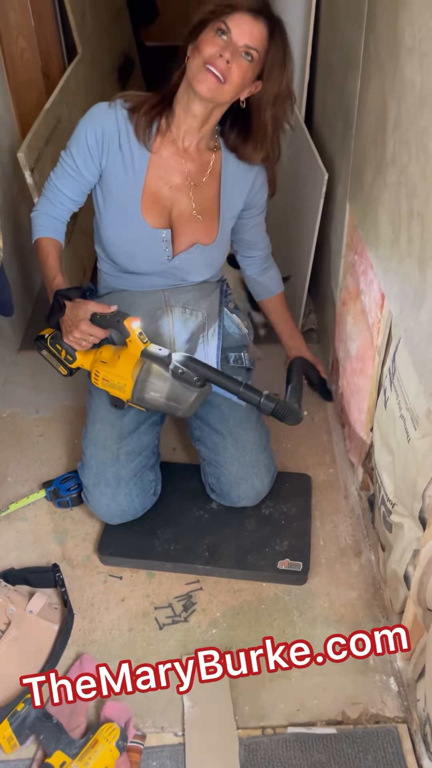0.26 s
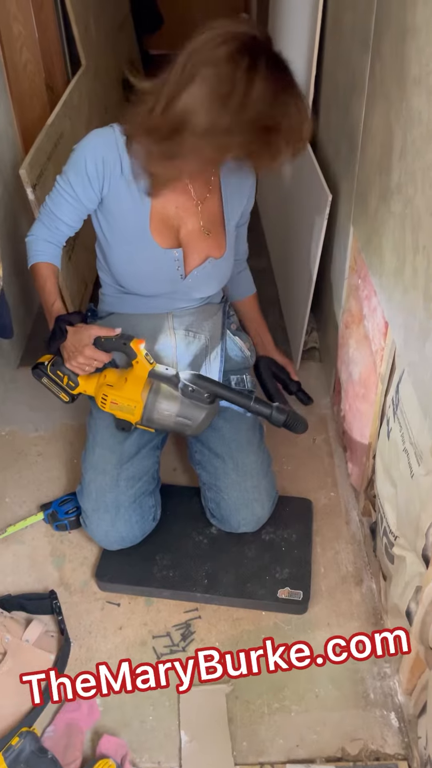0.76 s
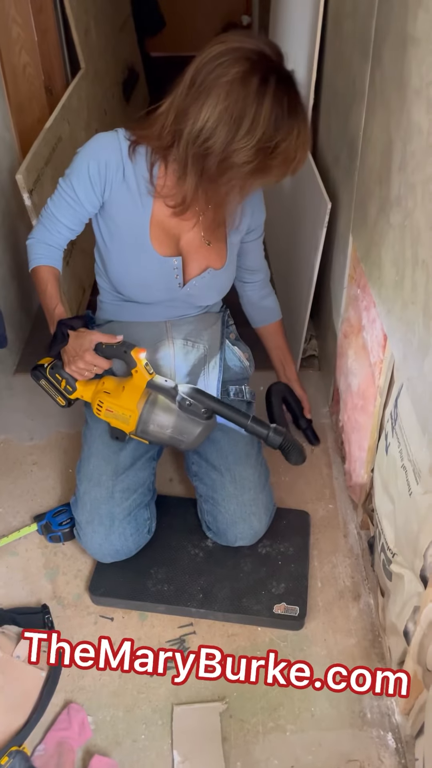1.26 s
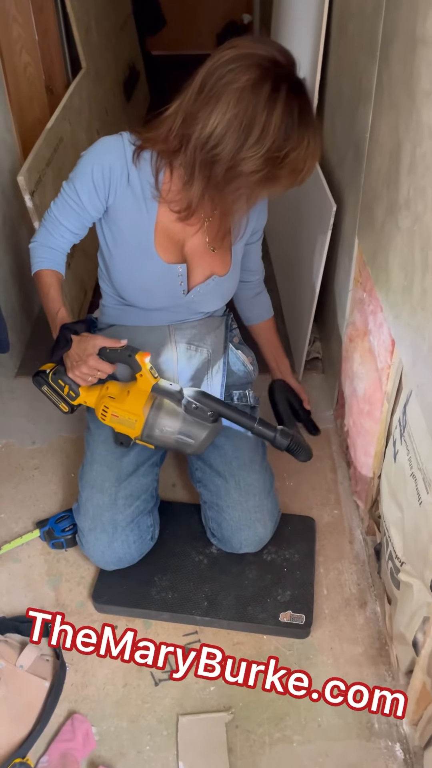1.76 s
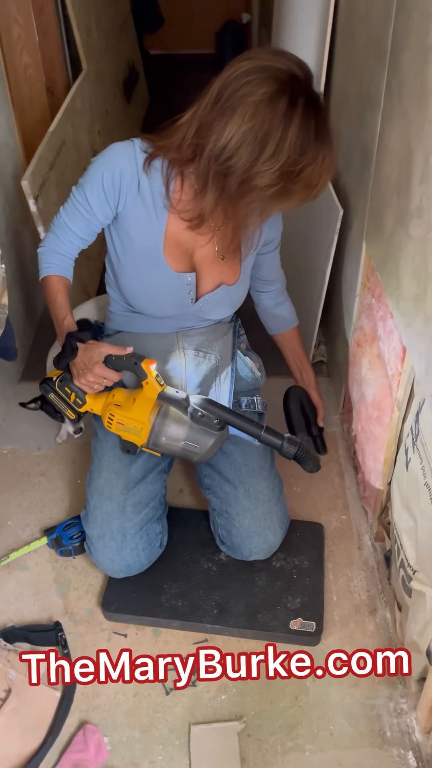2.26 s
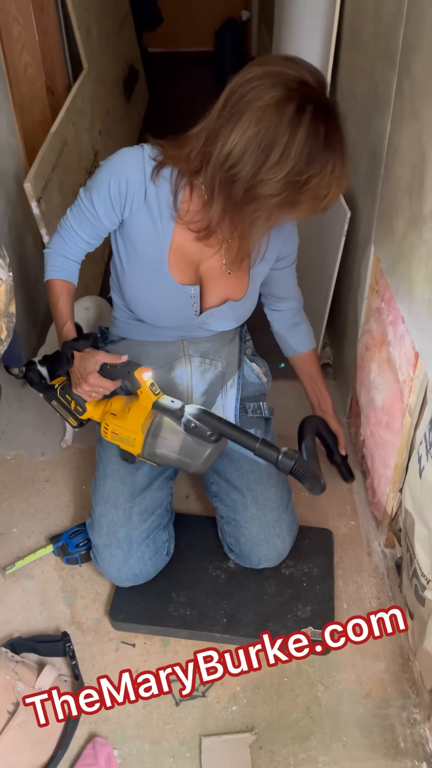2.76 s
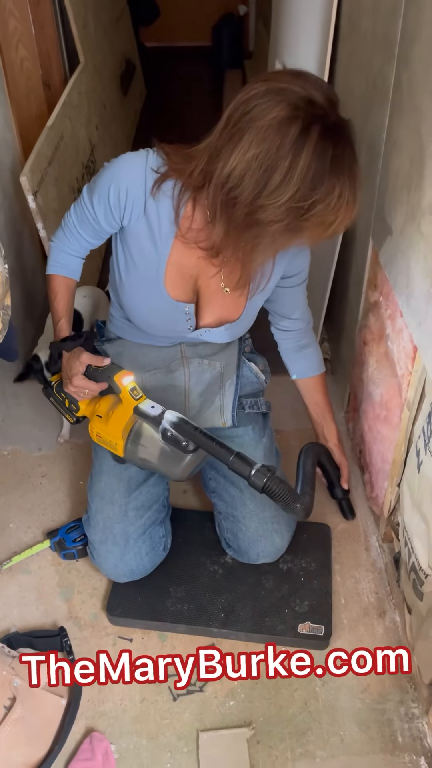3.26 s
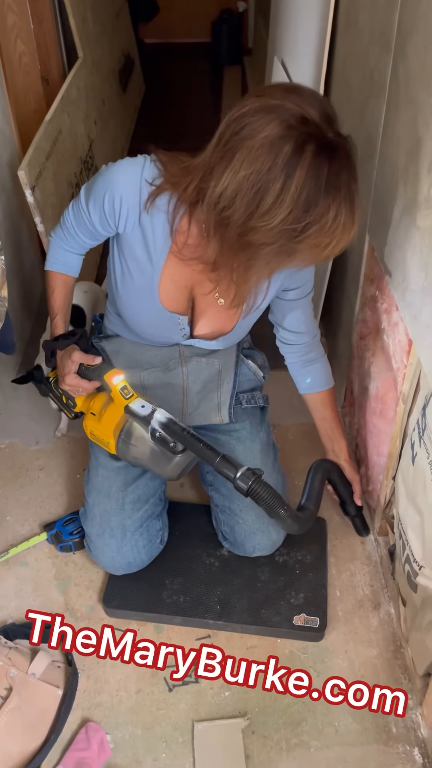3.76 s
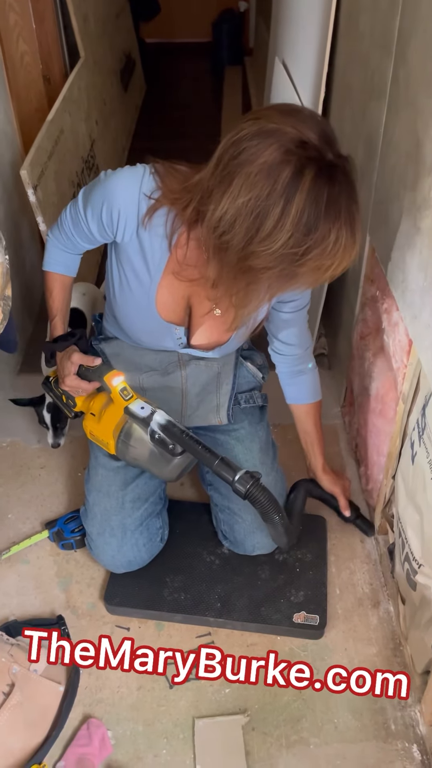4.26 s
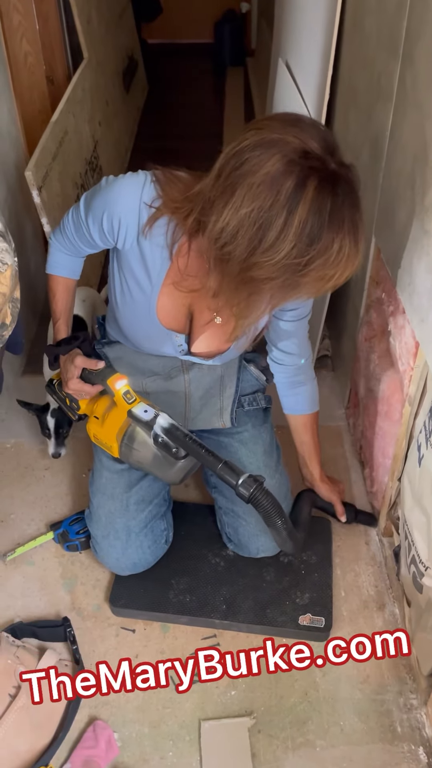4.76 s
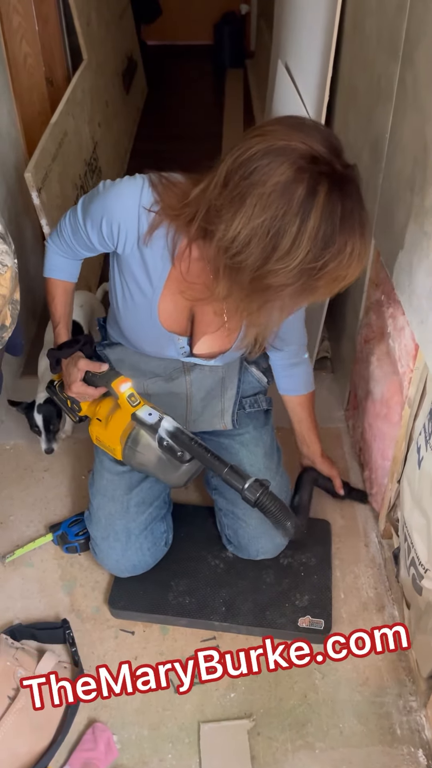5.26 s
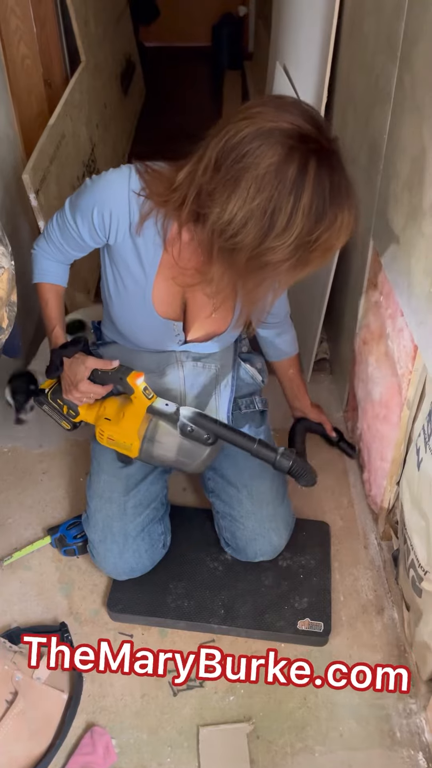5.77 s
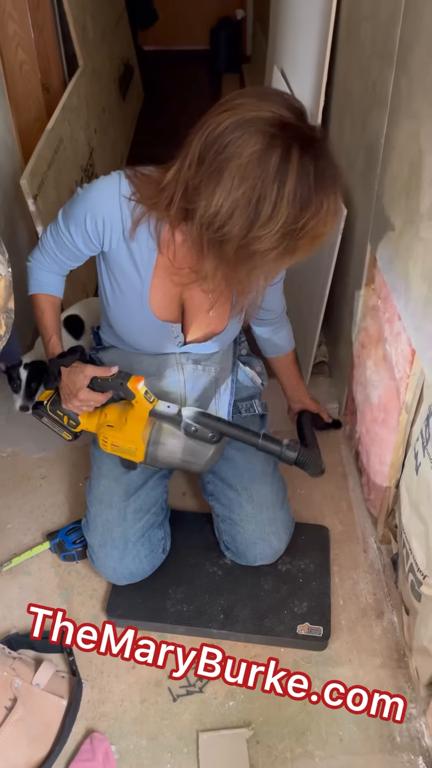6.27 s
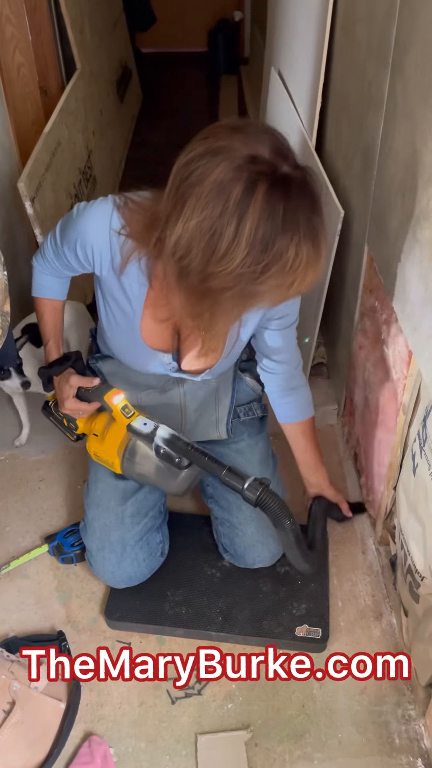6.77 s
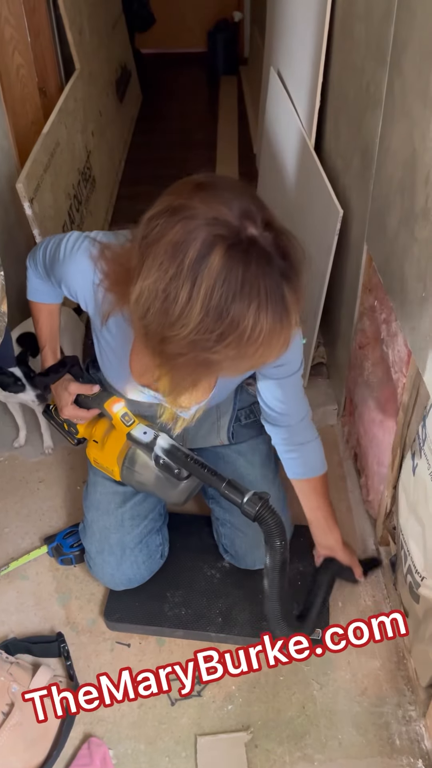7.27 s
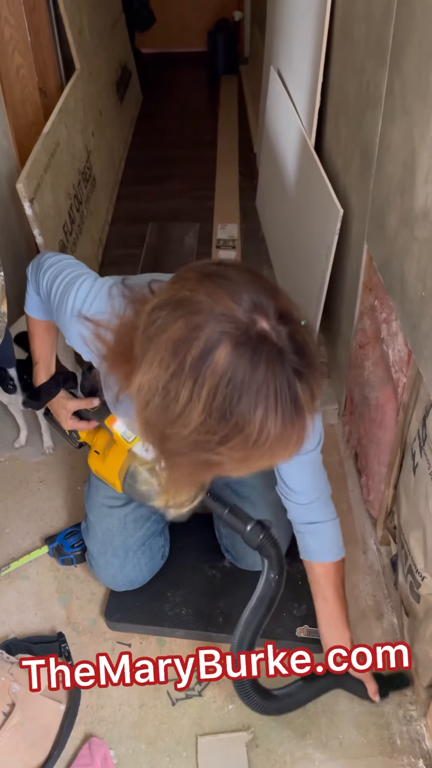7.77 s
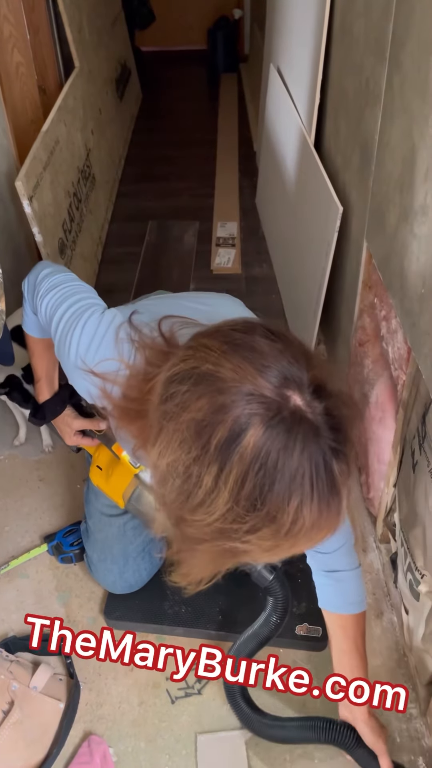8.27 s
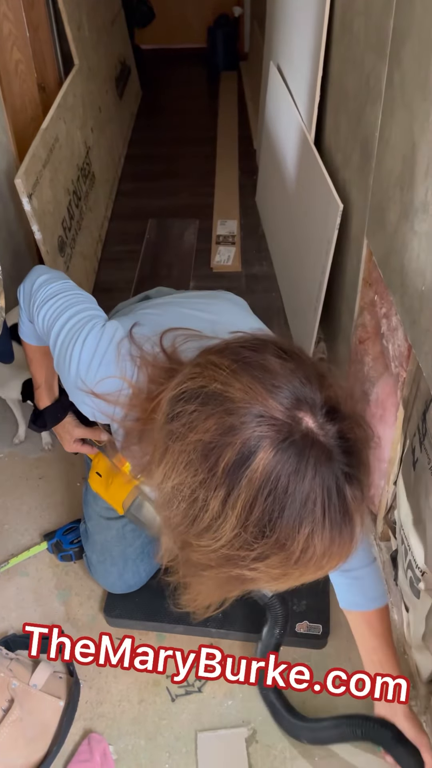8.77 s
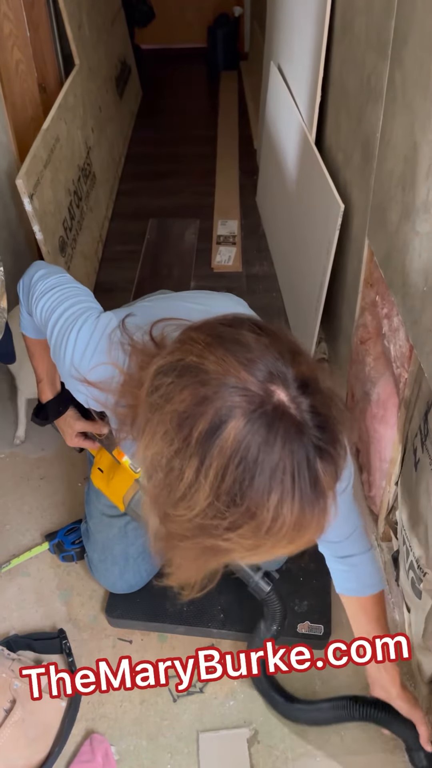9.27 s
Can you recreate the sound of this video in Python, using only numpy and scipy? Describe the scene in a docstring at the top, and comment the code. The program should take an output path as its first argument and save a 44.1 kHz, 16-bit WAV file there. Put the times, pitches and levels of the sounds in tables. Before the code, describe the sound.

Continuous handheld vacuum roar with motor hum and thin whine, hissing nozzle, and a few soft hose knocks and floor bumps, close indoors.

```python
"""A cordless hand vacuum runs for 9.5 s in a narrow hallway, its hose worked along the foot of a wall.
All along, the motor hums and whines, and noise shaped by resonances makes the rush, roar and hiss of air.
From about 1.5 s the rush changes colour as the kneeling user leans forward; soft bumps come at 2.3-2.6 s.
Around 3-5 s the covered hose rings and the pressed nozzle sings; then decaying tones make more soft knocks.
Near 7 s the hiss brightens as the nozzle sweeps forward, and by 8 s the rush takes its stooped colour."""
import sys
import numpy as np
from scipy import signal
from scipy.fft import rfft, irfft, next_fast_len
from scipy.io import wavfile
from scipy.ndimage import uniform_filter1d, map_coordinates

SR = 44100
rng = np.random.default_rng(int(sys.argv[2]) if len(sys.argv) > 2 else 0)


def inscribe(sig):
    """Save sig as 16-bit PCM at rate SR to the path in sys.argv[1].

    A 1-D sig is mono; a 2-D sig holds one channel per row.
    Samples are clipped to [-1, 1] before scaling.
    """
    pcm = np.round(np.clip(np.atleast_2d(sig).T, -1, 1) * 32767)
    wavfile.write(sys.argv[1], SR, pcm.astype(np.int16))


N = 419821  # length in samples

# turns per second of the motor, sagging and rising with the air load: (t/s, f/Hz)
MOTOR_SPEED = [(0.0, 436.71), (0.93, 434.78), (2.66, 436.41), (2.9, 435.76), (4.76, 435.57), (5.12, 434.79),
               (5.65, 435.16), (5.85, 436.14), (6.54, 436.63), (8.23, 436.39), (8.51, 434.9), (8.8, 434.15),
               (9.05, 434.45), (9.52, 433.2)]
# blade whine before its gain, swelling and fading as the machine moves through standing waves: (t/s, level/dB)
WHINE_LEVEL = [(0.0, -48), (0.32, -51), (0.61, -39.5), (0.64, -36), (0.82, -42.5), (1.03, -38),
               (1.35, -39.5), (1.43, -44), (1.51, -37.5), (1.69, -34.5), (1.8, -35), (2.09, -45.5),
               (2.15, -52), (2.22, -45), (2.84, -38.5), (3.21, -40.5), (3.34, -51), (3.53, -42),
               (4.32, -42.5), (4.61, -50), (5.38, -44.5), (5.46, -39), (5.59, -40), (5.67, -49),
               (5.73, -43.5), (5.99, -49), (6.02, -51), (6.07, -42), (6.2, -40), (6.28, -49), (6.39, -39.5),
               (6.65, -39.5), (6.84, -51), (6.95, -41), (7.21, -56), (7.34, -44), (7.45, -52), (7.87, -53),
               (7.98, -41.5), (8.22, -40.5), (8.3, -46), (8.54, -38), (8.62, -42.5), (8.93, -39),
               (9.2, -43.5), (9.39, -43), (9.47, -53), (9.52, -42)]
# level of the once-a-turn hum: (t/s, level/dB)
HUM_LEVEL = [(0, -45), (0.5, -38), (1.25, -43), (1.45, -38.5), (1.85, -36.5), (2.15, -43), (2.55, -35.5),
             (2.8, -42.5), (3.3, -34), (3.6, -38), (3.9, -36), (5.3, -38), (5.85, -41), (6.4, -39),
             (6.8, -34.5), (7.5, -38.5), (9.52, -39.5)]
# the other shaft tones: (multiple of the motor speed, level/dB)
SHAFT_TONES = [(3, -47), (10, -56), (12, -53), (21, -61), (24, -64), (28, -63), (35, -65)]
BLADE_ORDER = 14  # whine cycles in one turn
WHINE_GAIN_DB = 6  # added to the whine's curve
WHINE_FADE_DB, WHINE_PORT_DB = 0.5, 1  # random fading of the whine: shared, and at each port
WHISTLE_DB, WHISTLE_SHADE_DB = -41, 8  # whistle when upright; its loss for each step of posture

# strength of the air noises: (t/s, housing rush level/dB before a small trim, hose roar level/dB,
# nozzle hiss level/dB)
AIR_LEVELS = [(0, -22, -35, -29.5), (3.3, -21.5, -35.5, -30), (5, -22, -36, -31), (6.4, -22, -34.5, -30),
              (7.6, -24, -35, -32), (8.2, -23.5, -38, -33), (9.52, -23, -37.5, -32.5)]
# the user's posture, 0 upright, 1 leaning, 2 stooped: (t/s, posture)
POSTURE_PATH = [(0, 0.06), (1.5, 0.059), (2.5, 1.09), (5.3, 0.75), (6.5, 1.26), (7.35, 1.12), (8.0, 2.06),
                (9.52, 1.9)]
# resonances of the rushing air in each posture: (f/Hz, half width/Hz, relative level/dB)
UPRIGHT_MODES = [(1145, 44, -10.5), (1510, 137, -2), (1704, 120, -4), (1880, 200, -3), (2216, 93, -1.5),
                 (2430, 59, -12), (2590, 100, -4.5), (2870, 100, -10), (3110, 130, -10), (3520, 115, -9.5),
                 (4230, 180, -14), (5260, 110, -18.5)]
LEANING_MODES = [(1302, 55, -1), (1389, 38, 0), (1532, 74, -3), (1660, 33, -6), (1876, 116, 0),
                 (2150, 150, -5.5), (2403, 67, -2.5), (2525, 47, 0), (2790, 104, -6.5), (3190, 180, -11),
                 (3520, 180, -10.5), (3920, 220, -15), (4350, 130, -11), (5420, 120, -18.5)]
STOOPED_MODES = [(1203, 9.7, -4), (1317, 78, -8.5), (1460, 114, -5), (1643, 75, -5), (1867, 85, -6),
                 (2180, 170, -9.5), (2415, 40, -1.5), (2633, 140, -6), (3110, 110, -17), (3526, 89, -8),
                 (3840, 170, -13.5), (4570, 120, -16), (4900, 140, -18.5), (5270, 91, -11)]
# lowest resonance of the rush: (t/s, level/dB)
LOW_RUSH_LEVEL = [(0, -33), (1.15, -35), (1.8, -32), (2.4, -32), (3.4, -35), (4.0, -36.5), (4.8, -37.5),
                  (7.2, -34.5), (8.1, -31), (9.52, -33)]
LOW_RUSH_HZ, LOW_RUSH_WIDTH_HZ = 989.4, 107  # its centre and half width
WANDER, WANDER_PER_S = .0045, 2.5  # size of the random pitch drift (a share); its random points a second

# air-column resonances of hose and bin: (f/Hz, half width/Hz, relative level/dB)
HOSE_MODES = [(181.4, 16, -1), (242, 41, -3), (329.3, 18, -1.5), (388, 41, -1.5), (452, 20.6, 2),
              (503, 14, -2), (547, 24, -2.5), (637, 30, -8.5)]
# air column that rings harder while the mouth is covered: (f/Hz, half width/Hz, relative level/dB)
COVERED_MODES = [(525, 25, -5), (557.4, 8.4, 0)]
# the mouth is partly covered: (start t/s, end t/s, ease in and out/s, level/dB)
MOUTH_COVERS = [(3.0, 4.7, 0.91, -39.5), (5.7, 5.8, 0.2, -38), (6.45, 6.65, 0.26, -38.5)]
# the hose flexes and rubs: (t/s, length/s, level/dB, centre f/Hz)
HOSE_RUBS = [(2.35, 0.17, -54, 95), (6.55, 0.15, -39, 286), (7.43, 0.13, -37.5, 275), (7.6, 0.65, -51, 168),
             (9.1, 0.85, -44, 194)]
RIB_FLUTTER_DB, RIB_CATCHES_PER_S = 4, 45  # the ribs catch and slip as the hose is dragged

# colour of the hiss, with dips near 7.8 and 13.5 kHz: (f/Hz, relative level/dB)
HISS_COLOUR = [(300, -15), (700, -1.5), (4500, 6.5), (5700, 4), (6300, 6.5), (7050, -3.5), (7800, -43),
               (8800, 6), (9900, -6), (11200, -6.5), (12600, -13), (13500, -28), (15700, -3)]
# the nozzle sings when pressed into the wall's corner: (f/Hz, half width/Hz, relative level/dB)
SINGING_MODES = [(2534, 120, 10), (3300, 240, -1.5), (3660, 120, 3), (4000, 170, -12), (4370, 89, 4),
                 (5260, 87, -8)]
# presses into the corner: (start t/s, end t/s, ease in and out/s, level/dB)
CORNER_PRESSES = [(3.698, 5.102, 0.71, -30.5), (7.0, 7.25, 0.33, -28.5)]
# the rush swells at one pitch after another as machine and hose move: (t/s, length/s, level/dB, centre f/Hz)
PITCHED_SWELLS = [(.15, 0.52, -36.5, 5100), (.25, 0.55, -35, 2950), (.6, 0.59, -31.5, 1736),
                  (1.2, 0.68, -45, 5320), (1.3, .4, -38, 3500), (1.4, 0.27, -33, 1405),
                  (2.95, 0.67, -33, 3710), (3.4, 0.44, -35.5, 1343), (4.85, 0.75, -38, 4490),
                  (4.9, 0.61, -31.5, 1905), (6.0, .22, -43, 5400), (6.15, 0.43, -33, 1536),
                  (6.2, 0.75, -35.5, 1346), (7.25, .2, -32, 1860), (7.3, .4, -39, 5250),
                  (7.5, 0.63, -33, 2020), (8.8, 0.8, -33, 3510)]
# broad brightening as the nozzle is swung forward: (t/s, length/s, level/dB, centre f/Hz)
FORWARD_SWELLS = [(6.8, 0.23, -32, 3000), (6.95, .3, -33, 3900), (7.2, .3, -36.5, 4400)]

# colour of the room's rumble: (f/Hz, relative level/dB)
RUMBLE_COLOUR = [(20, -35), (36, -18), (47, 11), (60, -3), (100, 2), (150, -1), (220, 7), (400, -51)]
# soft bumps on the floor, level before the soft onset: (t/s, level/dB, pitch f/Hz, time to fade 60 dB/s)
FLOOR_BUMPS = [(2.265, -40, 92, .16), (2.54, -31, 82, 0.2), (2.575, -39, 108, .2), (5.695, -30.5, 113, .24),
               (6.228, -34, 70, .12), (8.289, -43, 62, .16)]
# hose and nozzle knock softly on wall and floor, level before halving:
# (t/s, level/dB, pitch f/Hz, time to fade 60 dB/s)
HOSE_KNOCKS = [(4.314, -31, 182, 0.2), (5.315, -26.5, 333, .14), (5.57, -31, 553, .16),
               (5.778, -26, 181, 0.19), (6.455, -30, 174, .18), (6.505, -27, 540, .14),
               (6.585, -28, 543, 0.12), (6.59, -33, 179, .15), (7.48, -33, 185, .15),
               (7.712, -27, 275, .09), (7.738, -31, 195, .13), (8.315, -31, 180, .18)]
KNOCK_ATTACK_S, KNOCK_SCUFF_DB = 0.0074, -2  # soft contact; scuff against the ring

# how alike noise is at the two microphone ports: (f/Hz, likeness 0-1)
PORT_LIKENESS = [(100, .9995), (300, .985), (600, .95), (1400, .89), (2000, .77), (2500, .58), (4500, .5),
                 (6000, .67), (7500, .88), (9400, .62), (11000, .88), (12600, .55), (14000, .8)]
# phase by which the left port leads: (f/Hz, lead/radians)
PORT_LEAD = [(100, 0), (900, .1), (1600, .3), (2100, .1), (2480, 1.7), (2800, .95), (4500, .9), (5100, -.2),
             (6100, 1.6), (7300, 3), (9000, 4.2), (10200, 6.1), (12200, 6.5), (13300, 9.2), (15500, 9.9)]
# left port's level minus the right's: (f/Hz, level difference/dB)
PORT_TILT = [(150, 0), (380, .7), (700, 3.2), (1290, 4.5), (2380, 0)]
TOP_HZ, FADE_S = 15800, .004  # highest pitch kept; fade at each end


def amp(db):
    """Turn decibels into a gain."""
    return 10 ** (np.asarray(db) / 20)


def unit(x):
    """Scale a sound to an average strength (rms) of 1."""
    return x / np.sqrt(np.mean(x ** 2) + 1e-20)


def along(points, hz):
    """Read a (frequency, value) curve, spacing frequencies by ratio as pitch is heard."""
    f, value = np.transpose(points)
    return np.interp(np.log(hz + 1), np.log(f + 1), value)


def curves(rows):
    """Give one value per sample for each column after the time."""
    times, *columns = np.transpose(rows)
    return [np.interp(np.arange(N) / SR, times, column) for column in columns]


def wobble(rate):
    """Draw a smooth random curve through `rate` random points a second."""
    points = rng.standard_normal(int(N * rate / SR) + 4)
    return map_coordinates(points, [np.arange(N) * rate / SR])


def filtered(x, response):
    """Scale each frequency of a sound by the given response."""
    m = next_fast_len(N + 8192)
    hz = np.fft.rfftfreq(m, 1 / SR)
    return irfft(rfft(x, m) * response(hz), m)[..., :N]


def resonances(modes):
    """Make a gain curve of steep-sided resonances whose powers add."""
    def gain(hz):
        power = 0
        for centre, width, db in modes:
            power = power + amp(db) ** 2 / (1 + ((hz - centre) / width) ** 2) ** 2
        return np.sqrt(power)
    return gain


def ports(hz):
    """Give the level and phase with which each microphone port receives the machine."""
    half = amp(along(PORT_TILT, hz) / 2) * np.exp(.5j * along(PORT_LEAD, hz))
    return np.array([half, 1 / half])


def turbulence(colour):
    """Make the noise of swirling air, rms 1, coloured and partly alike at the two ports."""
    m = next_fast_len(N + 8192)
    hz = np.fft.rfftfreq(m, 1 / SR)
    shared, apart = rfft(rng.standard_normal((2, m))) * colour(hz)
    # mixing by this angle gives the wanted likeness
    turn = np.arccos(np.clip(along(PORT_LIKENESS, hz), 0, 1)) / 2
    shared, apart = shared * np.cos(turn), apart * np.sin(turn)
    both = np.array([shared + apart, shared - apart]) * ports(hz)
    return unit(irfft(both, m)[:, :N])


def swells(rows, width):
    """Let bands of air noise rise and fade; width is a share of the centre frequency."""
    t = np.arange(N) / SR
    out = 0
    for s, length, db, hz in rows:
        envelope = np.exp(-((t - s) / length) ** 2)
        out = out + amp(db) * envelope * turbulence(resonances([(hz, width * hz, 0)]))
    return out


def held(start, end, ease):
    """Ease a gesture in toward 1, hold it from start to end, and ease it out."""
    t = np.arange(N) / SR
    return np.exp(-((t - np.clip(t, start, end)) / ease) ** 2)


def gestures(rows):
    """Add up the gains of a series of held gestures."""
    return sum(amp(db) * held(start, end, ease) for start, end, ease, db in rows)


def wandering(x):
    """Slide all pitches of a noise slowly up and down, as resonances drift, by reading it at uneven speed."""
    ahead = np.cumsum(WANDER * wobble(WANDER_PER_S))
    return np.array([map_coordinates(side, [np.arange(N) + ahead], mode="mirror") for side in x])


def eddies(x, patchy_db=1.0):
    """Passing eddies lift and drop patches a few hundred hertz wide for some tens of milliseconds."""
    z = signal.stft(x, nperseg=512)[2]
    field = rng.standard_normal(z.shape[1:])
    field = uniform_filter1d(field, size=4, axis=0)  # spread over frequency
    field = uniform_filter1d(field, size=9, axis=1)  # spread over time
    return signal.istft(z * amp(patchy_db * unit(field)), nperseg=512)[1][:, :N]


def passing_walls(x, count=8, strength=0.098, drift_ms=0.099, near_ms=6.5, far_ms=24):
    """Reflections off floor, wall and body change length as the machine sways: a drifting comb."""
    n = np.arange(N)
    out = x.copy()
    for ms in np.geomspace(near_ms, far_ms, count):
        lag_ms = ms * rng.uniform(.85, 1.1485) + drift_ms * wobble(0.897)
        lag = lag_ms * SR / 1000
        echo = np.array([np.interp(n - lag, n, side) for side in x])
        out += rng.choice([-1, 1]) * strength * echo
    return out / np.sqrt(1 + count * strength ** 2)


def floor(rumble_db=-54, attack=0.005, overtone_db=-13):
    """Low room rumble, and dull, soft-edged bumps that ring a floor mode and its two neighbours."""
    out = np.zeros(N + SR)
    t = np.arange(SR // 2) / SR
    for s, db, hz, t60 in FLOOR_BUMPS:
        below, main, above = (np.sin(2 * np.pi * hz * ratio * t + rng.uniform(0, 2 * np.pi))
                              for ratio in (.75, 1, 1.3))
        ring = main + amp(overtone_db) * (below + above)
        envelope = amp(db - 60 * t / t60) * (1 - np.exp(-t / attack)) ** 2
        out[round(s * SR):][:len(t)] += envelope * ring
    rumble = turbulence(lambda hz: amp(along(RUMBLE_COLOUR, hz)))
    return out[:N] + amp(rumble_db) * rumble


def knocks():
    """Each knock sets the hose's air column ringing briefly, with a dull scuff."""
    out = np.zeros((2, N + SR))
    t = np.arange(SR // 2) / SR
    scuff = turbulence(resonances(HOSE_MODES))
    for s, db, hz, t60 in HOSE_KNOCKS:
        at = round(s * SR) + np.arange(len(t))
        envelope = (1 - np.exp(-t / KNOCK_ATTACK_S)) * amp(-60 * t / t60)
        envelope = envelope / envelope.max()
        ring = np.sqrt(2) * np.sin(2 * np.pi * hz * t + rng.uniform(0, 2 * np.pi))
        out[:, at] += amp(db) * envelope * (ring + amp(KNOCK_SCUFF_DB) * scuff[:, at]) / 2
    return out[:, :N]


def hose(roar_db):
    """Intake air roars in the hose's air column; the ribbed wall flutters where it is bent or dragged."""
    roar = amp(roar_db + 0.71 * wobble(8)) * turbulence(resonances(HOSE_MODES))
    ring = gestures(MOUTH_COVERS) * turbulence(resonances(COVERED_MODES))
    catches = unit(amp(RIB_FLUTTER_DB * wobble(RIB_CATCHES_PER_S)))
    return roar + ring + catches * swells(HOSE_RUBS, width=0.21)


def nozzle(hiss_db):
    """Air hisses over the nozzle's edge, sings where the gap narrows and brightens as it is swung forward."""
    hiss = amp(hiss_db) * turbulence(lambda hz: amp(along(HISS_COLOUR, hz)))
    singing = gestures(CORNER_PRESSES) * turbulence(resonances(SINGING_MODES))
    whooshes = swells(PITCHED_SWELLS, width=0.031)
    return hiss + wandering(singing + whooshes) + swells(FORWARD_SWELLS, width=0.11)


def shaft_tone(angle, order):
    """A tone of rms 1 at a multiple of the shaft's rotation, as both ports hear it."""
    mean_hz = order * np.mean(np.array(MOTOR_SPEED)[:, 1])
    return unit(np.real(ports(mean_hz)[:, None] * np.exp(1j * order * angle)))


def motor(jitter=0.00025, fade_db=3.5, flutter_db=1.0, drift_db=0.4, hum_waver=0.2):
    """Imbalance hums once a turn; the blades whine and whistle; weaker shaft tones drift in and out."""
    posture = curves(POSTURE_PATH)[0]
    speed = curves(MOTOR_SPEED)[0] * (1 + jitter * wobble(30))
    angle = 2 * np.pi * np.cumsum(speed) / SR

    hum_db = curves(HUM_LEVEL)[0] + drift_db * wobble(4.5) + flutter_db * wobble(24)
    hum = amp(hum_db) * shaft_tone(angle + hum_waver * wobble(23), order=1)

    port_fading_db = WHINE_PORT_DB * np.array([wobble(6.1), wobble(2.9)])
    fading_db = WHINE_FADE_DB * wobble(7) + port_fading_db + 0.8 * wobble(25)
    whine_db = curves(WHINE_LEVEL)[0] + WHINE_GAIN_DB + fading_db
    whine = amp(whine_db) * shaft_tone(angle, order=BLADE_ORDER)

    # the whistle lies an octave under the whine
    whistle_db = WHISTLE_DB - WHISTLE_SHADE_DB * posture + 2 * wobble(3.55) + 2.4 * wobble(20)
    whistle = amp(whistle_db) * shaft_tone(angle, order=BLADE_ORDER // 2)

    overtones = 0
    for order, db in SHAFT_TONES:
        overtones = overtones + amp(db + fade_db * wobble(3.94)) * shaft_tone(angle, order=round(order))
    return hum + whine + whistle + overtones


def housing(rush_db, surge_db=0.16, churn_db=0.4):
    """Exhaust air surges and churns; its drifting resonances cross-fade as the machine turns to the floor."""
    posture = np.clip(curves(POSTURE_PATH)[0], 0, 2)
    rush = 0
    for k, modes in enumerate([UPRIGHT_MODES, LEANING_MODES, STOOPED_MODES]):
        share = np.clip(1 - np.abs(posture - k), 0, 1)
        rush = rush + np.sqrt(share) * turbulence(resonances(modes))
    low_band = turbulence(resonances([(LOW_RUSH_HZ, LOW_RUSH_WIDTH_HZ, 0)]))
    low = amp(curves(LOW_RUSH_LEVEL)[0]) * low_band
    unsteadiness = amp(surge_db * wobble(15) + churn_db * wobble(90))
    return unsteadiness * wandering(amp(rush_db - 1.5) * rush + low)


def scene():
    """Mix the running vacuum over the floor's low sounds; rush and hiss also reflect off the surroundings."""
    rush_db, roar_db, hiss_db = curves(AIR_LEVELS)
    air = passing_walls(eddies(housing(rush_db) + nozzle(hiss_db)))
    return floor() + knocks() + hose(roar_db) + motor() + air


def record(dry, low_hz=40):
    """The phone cuts the deepest bass and keeps nothing above its band limit; the ends are eased."""
    t = np.arange(N) / SR
    ends = np.clip(np.minimum(t, t[-1] - t) / FADE_S, 0, 1)
    return filtered(dry * ends, lambda hz: (hz < TOP_HZ) / np.sqrt(1 + (low_hz / (hz + 1)) ** 8))


dry = scene()
out = record(dry)
inscribe(out)
```